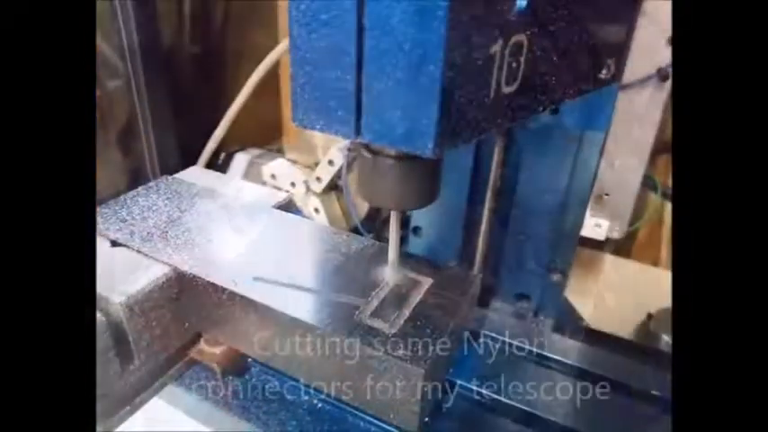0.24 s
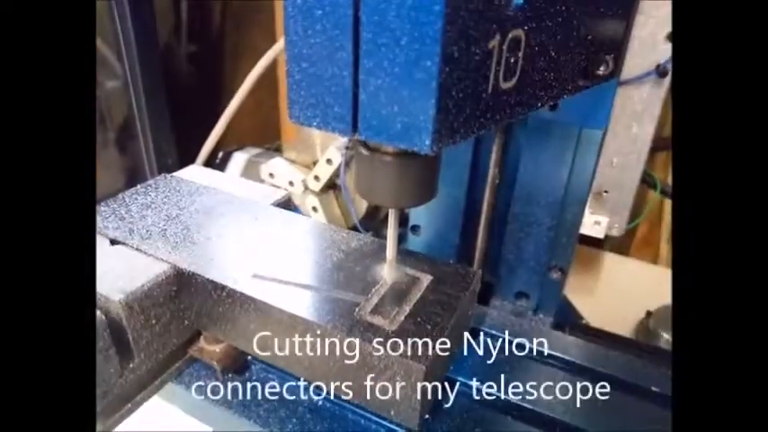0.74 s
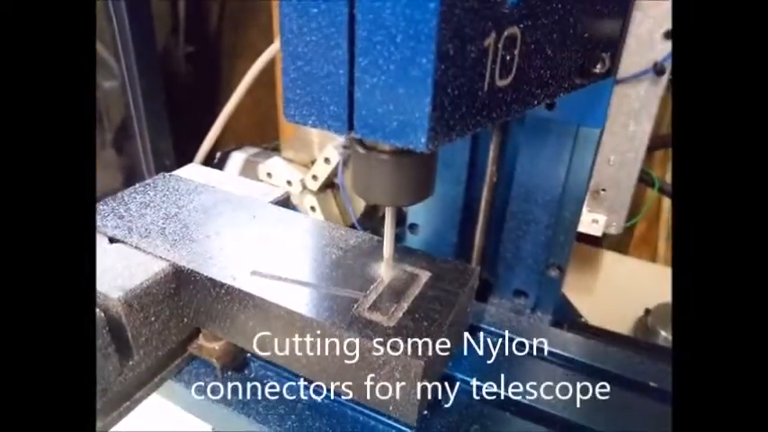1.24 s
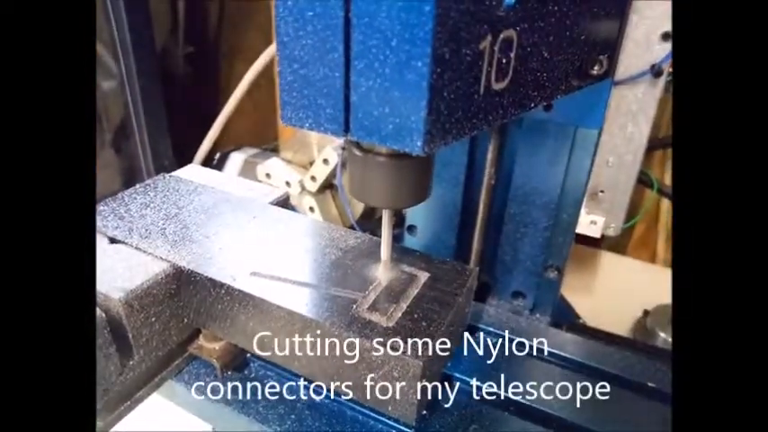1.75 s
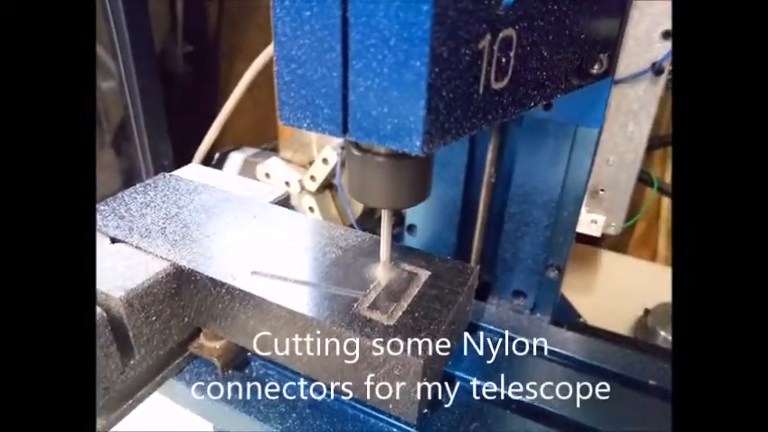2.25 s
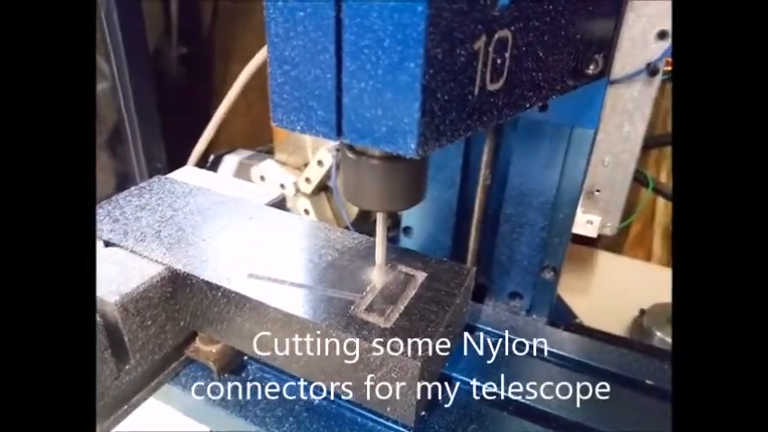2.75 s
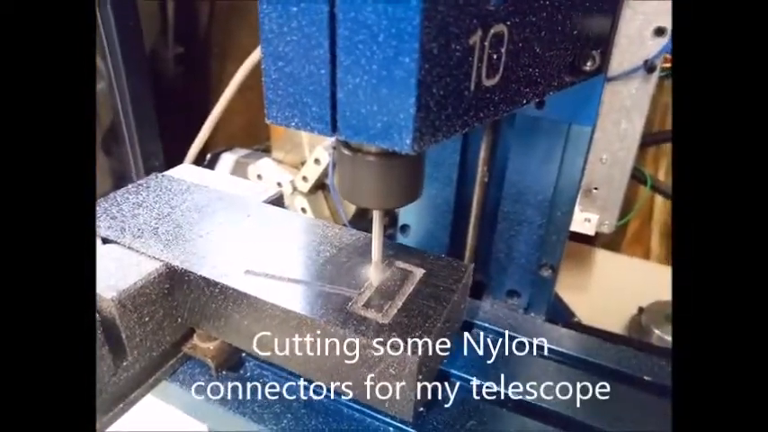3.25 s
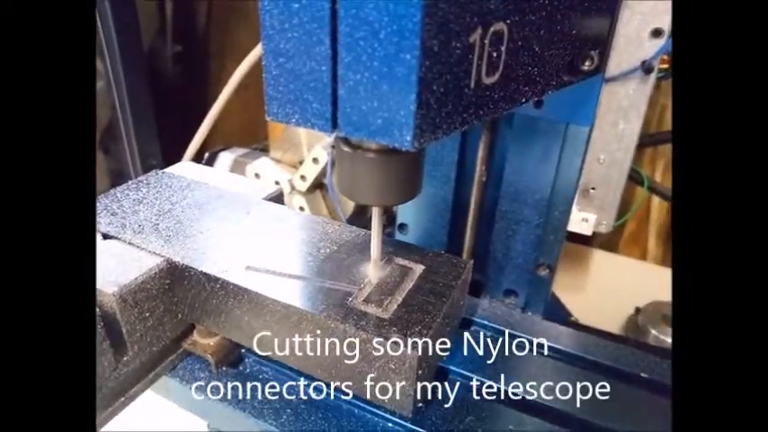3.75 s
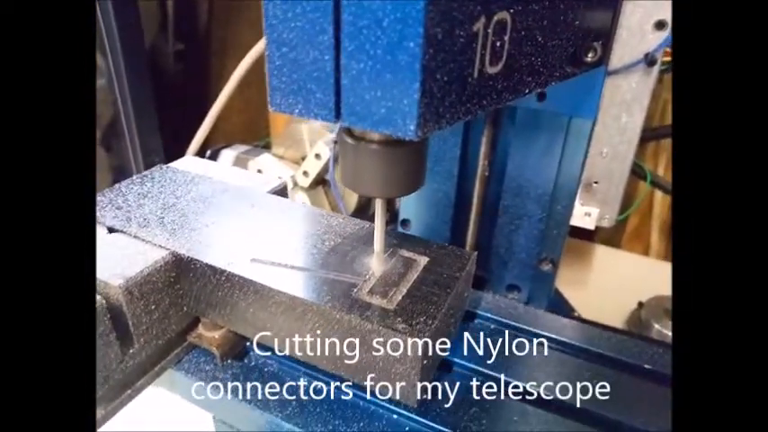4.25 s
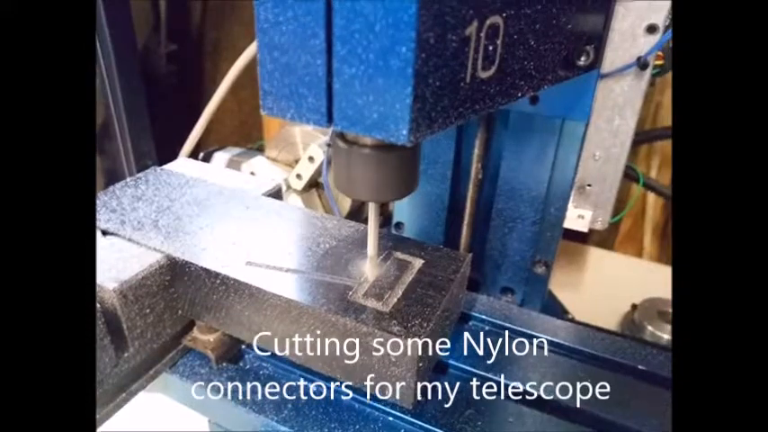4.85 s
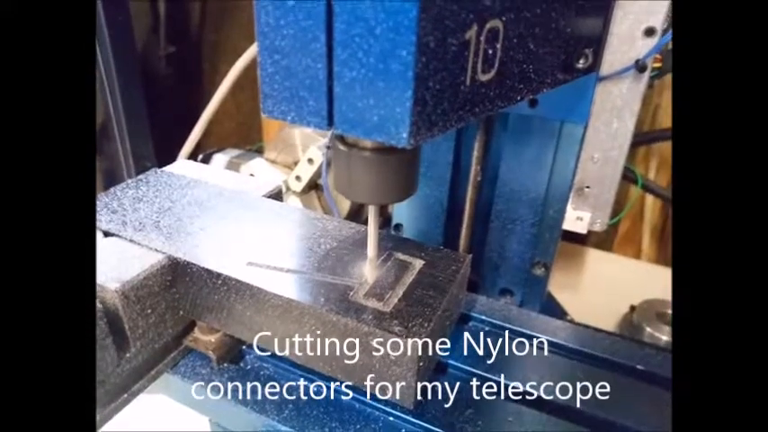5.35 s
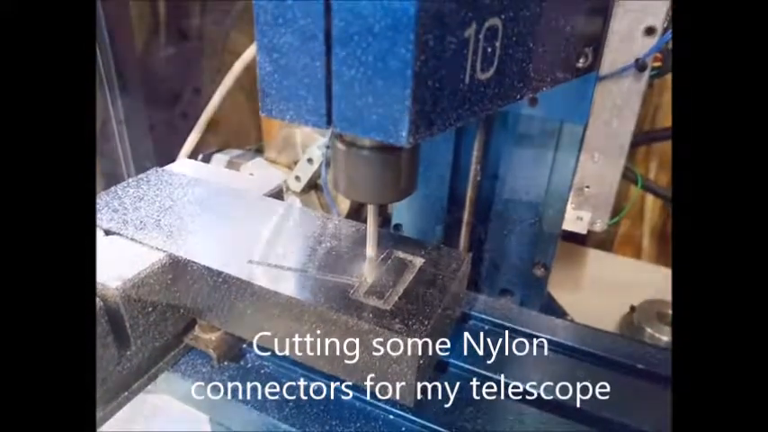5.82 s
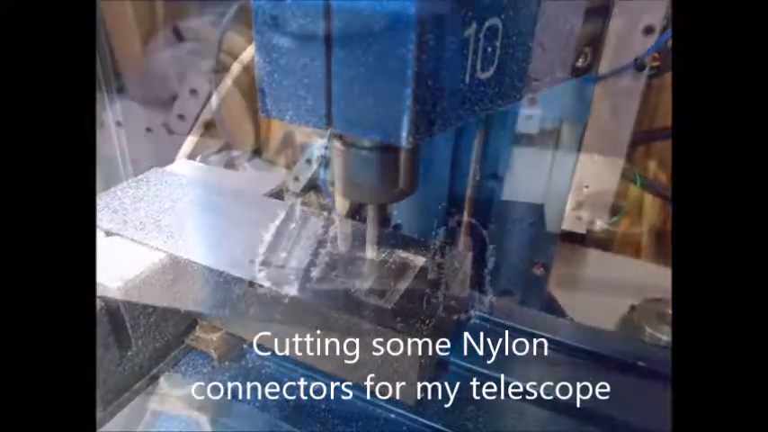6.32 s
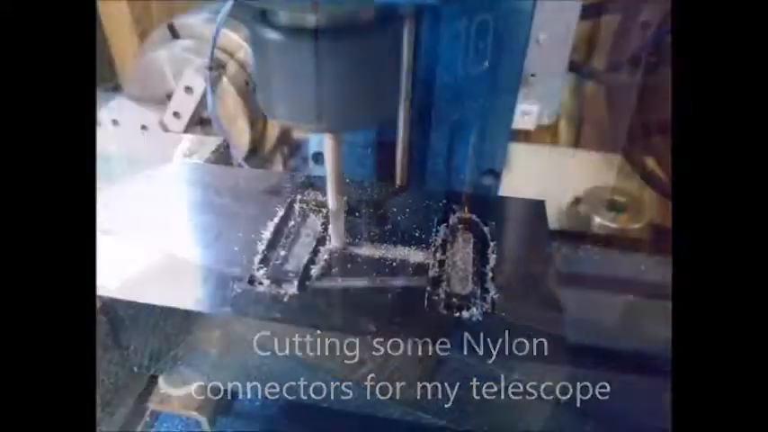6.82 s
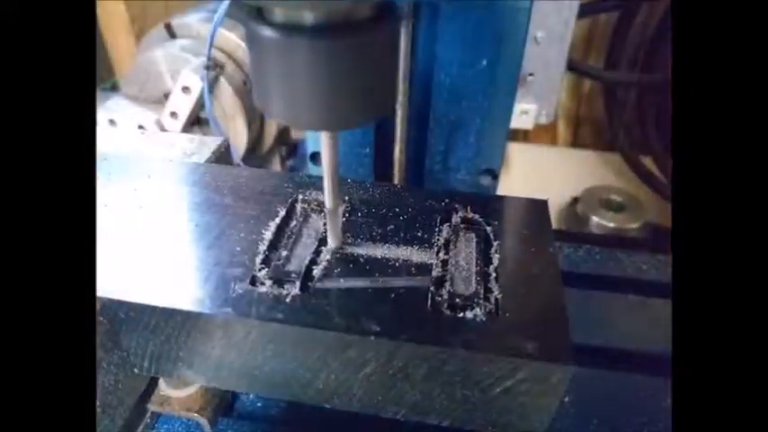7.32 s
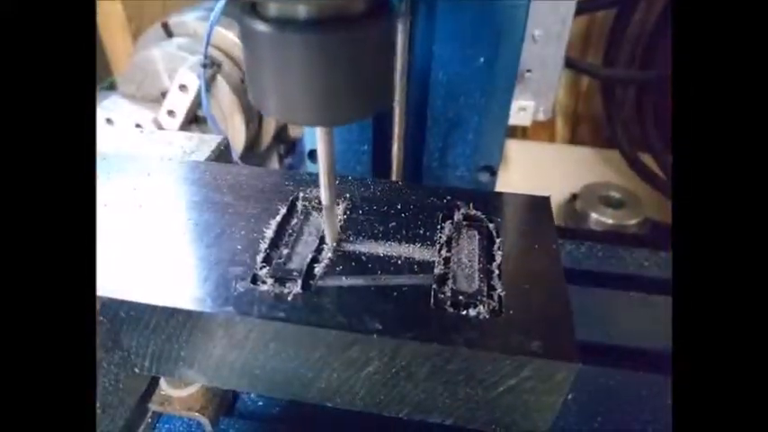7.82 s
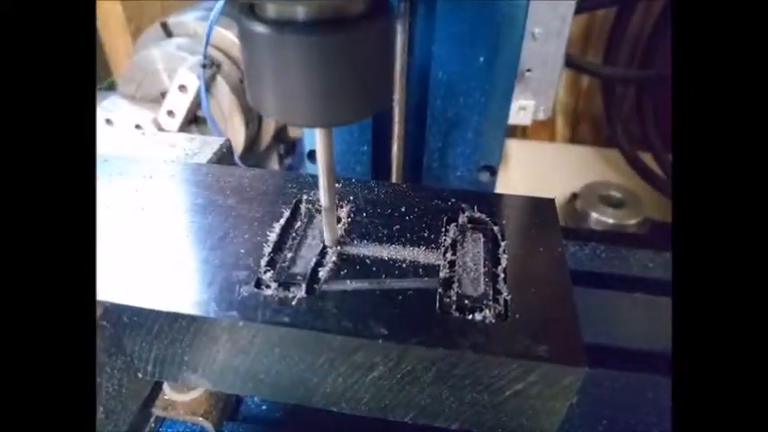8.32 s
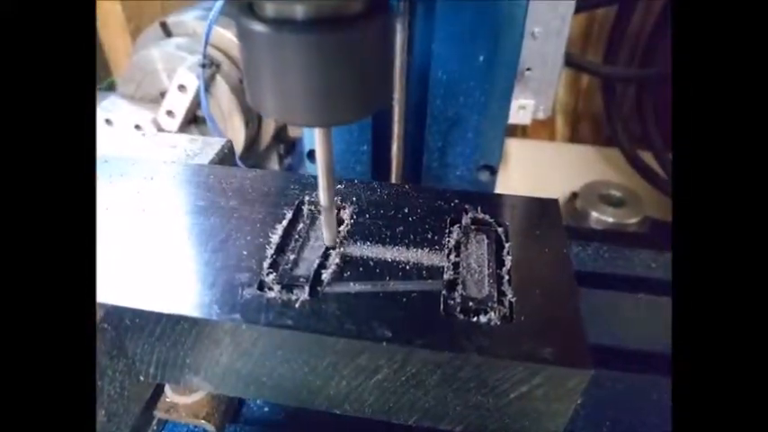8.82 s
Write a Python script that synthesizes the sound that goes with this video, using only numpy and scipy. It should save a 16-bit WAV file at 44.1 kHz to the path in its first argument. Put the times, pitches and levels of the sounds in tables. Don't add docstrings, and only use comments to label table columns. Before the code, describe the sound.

In a workshop, a small milling machine is already running: a piercing, wavering bearing whine around 2 kHz over low motor hum and rushing hiss as the cutter tears plastic. Two soft, dull air bumps come early. The noise eases slightly, then holds steady. At about seven seconds it stops abruptly, leaving a second, much quieter close view of the cutter with thin hiss and motor hum. Close stereo microphone.

```python
import sys
import numpy as np
from scipy import signal
from scipy.io import wavfile
from scipy.ndimage import uniform_filter1d

SR = 44100
rng = np.random.default_rng(int(sys.argv[2]) if len(sys.argv) > 2 else 0)


def boost(x):
    u = np.asarray(x, float) / 20
    return 10 ** u


def dump_mix(stems):
    frames = np.atleast_2d(stems).T
    limited = np.clip(frames, -1, 1)
    pcm = np.round(limited * 32767).astype(np.int16)
    wavfile.write(sys.argv[1], SR, pcm)


N = 399987
T = np.arange(N) / SR
COARSE = T[::100]
FIRST_ENDS, SECOND_STARTS = 7.082, 5.6
PULLEY = 2.291
BELT_HZ = 15.4
OCTAVE_ORDER = 41.35

# centre in seconds, level in dB, width in seconds.
BUMPS = [
    (.3183, -22.5, 0.00077),
    (0.3675, -25, 0.00072),
]

# time in seconds, cutting hiss in dB, bearing whine in dB.
FIRST_LEVELS = [(0, -26.5, -20), (.3, -26.5, -22.5), (.55, -27, -24.5), (.8, -29.5, -23.5), (1.1, -31, -25),
                (1.5, -31, -26), (2., -31, -26), (2.5, -31.5, -25), (3., -31, -26), (3.5, -31, -24),
                (4., -30.5, -25.5), (4.5, -31, -27), (5., -31.5, -24), (5.5, -31, -26), (5.8, -31, -27),
                (6.1, -32.5, -25.5), (6.4, -33.5, -32), (6.6, -33.5, -30), (6.8, -34, -31),
                (6.95, -34, -35), (7.08, -33, -30)]
# time in seconds, hiss in dB.
SECOND_LEVELS = [(5.6, -49.5), (5.7, -44), (5.8, -42), (5.92, -39), (6.1, -40.5), (6.3, -40.5), (6.45, -41),
                 (6.65, -44), (6.8, -39.5), (7., -39.5), (7.2, -41.5), (7.5, -42.5), (8., -43), (8.5, -42),
                 (9.07, -43.5)]

# time in seconds, speed in turns per second.
FIRST_MOTOR = [(0.0, 230), (0.57, 231), (1.26, 230), (1.65, 229.4), (1.79, 233), (2.88, 232), (2.98, 228),
               (3.43, 229.3), (3.69, 234), (4.38, 230), (4.61, 231), (5.05, 227), (5.46, 232.1),
               (6.03, 230), (6.49, 235), (6.9, 229.4), (7.08, 225)]
SECOND_MOTOR = [(6.2, 237), (6.49, 238.9), (7.28, 238.8), (7.37, 240), (8.69, 240.1), (8.78, 242),
                (9.07, 241)]
# time in seconds, frequency in Hz.
WHINE_PITCH = [(0.0, 2118), (0.99, 2113), (1.08, 2074), (1.14, 2124), (1.26, 2077), (1.91, 2114),
               (3.27, 2099), (3.29, 2130), (3.37, 2083), (3.41, 2126), (5.03, 2097), (5.48, 2132),
               (6.49, 2092), (6.64, 2120), (6.8, 2080), (6.86, 2134), (6.9, 2096), (7.08, 2119)]

# order in cycles per turn, left and right in dB above the hiss.
FIRST_SPINDLE = [(1., -19.5, -18.5), (2., -35, -34), (3., -28, -20.5)]
FIRST_DRIVE = [(1., -16.5, -18.5), (3., -20, -21), (4., -33, -30), (6., -18, -9.5), (12., -34, -20)]
SECOND_SPINDLE = [(1., -14, -13.5), (3., -21, -18)]
SECOND_DRIVE = [(1., -7, -10), (3., -7.5, -6.5), (8., -6, -15), (12., -11, -24), (14., -8, -17)]
# offset in spindle orders, left and right in dB.
WHINE = [(-5.5, -26, -24), (-3, -26, -28), (-2.5, -25, -13), (-1, -10, -2.5), (0, -0.5, -20),
         (1.5, -7, -10), (2, -14.5, -15), (3, -12.5, -22.5)]
OCTAVE = [(-4, -29.5, -24), (-0.5, -21.5, -24), (0, -23, -15.5), (0.5, -17, -28), (2, -16, -12.5),
          (3, -28, -19.5)]

# frequency in Hz, left and right in dB per Hz.
FIRST_HISS = [(25, -30, -30), (70, -24, -23), (150, -21, -21.5), (330, -19.5, -15), (465, -20, -22.5),
              (617, -10.5, -12), (1500, -7, -6.5), (2700, -6.5, -5.5), (4060, -5.5, -4), (6850, -11.5, -12),
              (8200, -22, -22), (10600, -14, -21), (13800, -16.5, -37), (15500, -15.5, -20)]
SECOND_HISS = [(25, -32, -32), (70, -28, -29), (149, -18, -22), (456, -16, -19), (612, -9.5, -10),
               (990, -4.5, -4.5), (2200, -4.5, -7.5), (3100, -10.5, -12.5), (4600, -14.5, -16.5),
               (5200, -12.5, -23.5), (7050, -9.5, -30.5), (8400, -18.5, -40), (10600, -11, -44),
               (13660, -13, -48), (15480, -7.5, -34)]
# frequency in Hz, lead in radians.
FIRST_LEAD = [(0, 0), (860, -0.13), (1380, -4), (2240, -4.5), (3190, -4.5), (4310, 5.5), (8100, 25.0),
              (11100, 27.7), (13900, 47.0), (16500, 46)]
SECOND_LEAD = [(0, 0), (1890, 5), (3360, 18.5), (4050, 27.5), (5430, 22.0), (6370, 26.5), (7320, 36),
               (8700, 40.4), (13300, 51.7), (16500, 67.5)]
# frequency in Hz, correlation from 0 to 1.
SAME = [(40, 0.36), (120, .8), (350, 0.53), (700, .75), (1200, 0.44), (2000, 0.4), (3200, 0.17),
        (6000, 0.19), (11000, .05)]
# frequency in Hz, width in Hz, left and right in dB.
FIRST_BODY = [(328, 28, 4, 5), (582, 48, 6, 5.5), (698, 36, 7.5, 6), (756, 53, -7.5, 0), (810, 50, 4, 7.5),
              (973, 40, -7, 2), (1074, 137, 5.5, 10), (1160, 50, 5.5, 0.5), (1195, 36, -1.5, -5),
              (1245, 40, 5, 7.5), (1310, 47, -6, -5), (1384, 60, 6.5, 10.5), (1470, 40, -0.5, -9),
              (1480, 60, 5.5, 3), (1610, 35, -4, 3), (1708, 60, 6, 5), (1963, 155, 9.5, 11.5),
              (2150, 192, 11.5, 6), (2370, 200, 9.5, 7), (2560, 60, 0, 2), (3820, 150, -1, 3.5),
              (4230, 51, -6, 3), (4250, 350, 5.5, 4), (4880, 90, -4, 4), (5620, 140, 2, 1.5),
              (6440, 360, 4.5, 5), (8440, 330, 4.5, 3.5), (11470, 650, 6, -1), (15250, 200, 4, 6)]
SECOND_BODY = [(320.8, 71, -1, 5), (592, 57, 7, 6.5), (704.4, 43, 4.5, 7.5), (770, 50, -7, -3.5),
               (1070, 80, 4.5, 2.5), (1223, 120, 2, 5.5), (1501, 150, 3.5, -4.5), (1880, 110, 3.5, 4),
               (2050, 60, -5, -4), (2350, 200, 3, -1), (2530, 100, 0.5, -5), (2840, 80, 5, 0),
               (3330, 100, 7.5, 4), (4300, 91, 5, -1), (6780, 220, 1.5, -1), (11750, 500, 2.5, -4),
               (15000, 780, 4, 0)]


def evened(x):
    return x / np.sqrt(np.mean(x ** 2) + 1e-20)


def read(points, hz):
    f, value = np.transpose(points)
    return np.interp(np.log(hz + 1), np.log(f + 1), value)


def curve(rows, column=1):
    rows = np.asarray(rows)
    return np.interp(T, rows[:, 0], rows[:, column])


def wander(hz, count=1):
    lowpass = signal.butter(2, np.clip(hz, .1, 200), fs=SR / 100, output="sos")
    smooth = signal.sosfilt(lowpass, rng.standard_normal((len(COARSE), count)).T)
    return smooth / smooth.std(1, keepdims=True)


def smoothed_patches(chance, bands, frames):
    return evened(uniform_filter1d(uniform_filter1d(chance, bands, 0), frames, 1))


def lines(turns, table, base=0, flutter_db=2., flutter_hz=6.5, sway=0, sway_db=0):
    out = np.zeros((2, len(turns)))
    for order, left_db, right_db in table:
        start, lean = rng.random((2, 2, 1))
        db = np.array([[left_db], [right_db]]) + flutter_db * wander(flutter_hz, count=2)
        db = db + sway_db * np.cos(2 * np.pi * (sway + lean / 3))
        spread = 1 if np.ndim(base) else min(order / 8, 1)
        angle = (2 * np.pi * ((base + round(order) * turns) % 1)).astype(np.float32)
        for port, gain in enumerate(np.sqrt(2) * boost(db)):
            phase = np.float32(2 * np.pi * start[port, 0] * spread)
            out[port] += np.interp(T[:len(turns)], COARSE, gain) * np.cos(angle + phase)
    return out


def hiss(count, colour, lead, body, lo_hz, hi_hz, patchy_db, gaps=0.):
    frames, hz = count // 256 + 5, np.fft.rfftfreq(1024, 1 / SR)
    a, b, c, d, chance = rng.standard_normal((frames, 513, 5), np.float32).T
    patches = smoothed_patches(chance, 14, 12)

    same = np.clip(read(SAME, hz), 0, 1)[:, None]
    right = a + 1j * b
    turn = np.exp(1j * np.interp(hz, *np.transpose(lead)))[:, None]
    left = same * right * turn + np.sqrt(1 - same ** 2) * (c + 1j * d)

    base_db = np.array([read([(row[0], row[k]) for row in colour], hz) for k in (1, 2)])
    rings_db = sum(np.array([[l_db], [r_db]]) / (1 + (2 * (hz - f) / w) ** 2)
                   for f, w, l_db, r_db in body)
    gain = boost(base_db + rings_db)
    in_band = (hz > lo_hz) & (hz < hi_hz)
    gain /= np.sqrt((gain[:, in_band] ** 2).sum())

    specks = smoothed_patches(chance[::-1], 7, 7)
    valley = np.exp(-((hz[:, None] - 8500) / 1500) ** 4)
    kept = np.clip(3 * (specks + 3.47 - gaps * valley), .02, 1)

    z = np.array([left, right]) * gain[:, :, None] * (boost(patchy_db * patches) * kept)
    return 2.49 * signal.istft(z.astype(np.complex64), nperseg=1024, noverlap=768)[1][:, :count]


def bumps():
    out = np.zeros(N)
    for centre, db, width in BUMPS:
        x = (T - centre) / width
        out -= boost(db) * (1 - 0.8 * x ** 2) * np.exp(-x ** 2 / 2)
    return out


def second_stand():
    first = round(SECOND_STARTS * SR)
    turns = np.cumsum(curve(SECOND_MOTOR)[first:]) / SR
    hum = lines(turns / PULLEY, SECOND_SPINDLE, 0, 2.5) + lines(turns, SECOND_DRIVE, 0, 3.8, 15.)
    air = hiss(N - first, SECOND_HISS, SECOND_LEAD, SECOND_BODY, 14350, 15380, 1.12)
    fade = np.clip(T[:N - first] / 0.11, 0, 1)
    sound = boost(curve(SECOND_LEVELS)[first:]) * (boost(0.67) * air + hum) * fade
    return np.pad(sound, [(0, 0), (first, 0)])


def cutting_hiss(turns):
    air = hiss(len(turns), FIRST_HISS, FIRST_LEAD, FIRST_BODY, 2610, 6900, 1.14, gaps=3.06)
    treble = signal.sosfilt(signal.butter(2, 4000., "high", fs=SR, output="sos"), air)
    return air + 0.21 * np.cos(2 * np.pi * turns) * treble


def bearing_whine(spindle_hz, turns):
    count = len(turns)
    belt = BELT_HZ * COARSE + 0.13 * wander(1.5)[0]
    tug = 0.01 * np.cos(2 * np.pi * belt) + 0.0041 * np.cos(np.pi * belt + 1.1)
    tug = np.interp(T[:count], COARSE, tug + .003 * wander(30.6)[0])
    main = np.cumsum(curve(WHINE_PITCH)[:count] * (1 + tug)) / SR
    upper = OCTAVE_ORDER * np.cumsum(spindle_hz * (1 + 0.46 * tug)) / SR
    whine = lines(turns, WHINE, main, 2.55, 21.0, belt / 2, 1.9)
    return whine + lines(turns, OCTAVE, upper, 4.9, 10.0, belt / 2, 3.3)


def first_stand():
    count = round(FIRST_ENDS * SR)
    spindle_hz = curve(FIRST_MOTOR)[:count] / PULLEY
    turns = np.cumsum(spindle_hz) / SR
    whine = bearing_whine(spindle_hz, turns)
    hum = lines(turns, FIRST_SPINDLE, 0, 1.5, 4.) + lines(turns * PULLEY, FIRST_DRIVE, 0, 2.1, 8.3)
    cutting = boost(-0.88) * cutting_hiss(turns) + hum
    sound = boost(curve(FIRST_LEVELS)[:count]) * cutting
    sound += boost(curve(FIRST_LEVELS, column=2)[:count] + .8) * whine
    return np.pad(sound, [(0, 0), (0, N - count)])


def scene():
    return bumps() + second_stand() + first_stand()


def low_pass(x):
    return signal.sosfilt(signal.butter(12, 16850, fs=SR, output="sos"), x)


def record(dry):
    edge = signal.firwin(511, 15650, window=("kaiser", 9), fs=SR)
    mix = signal.oaconvolve(dry, edge[None], "same")
    return low_pass(mix)


dry = scene()
out = record(dry)
dump_mix(out)
```